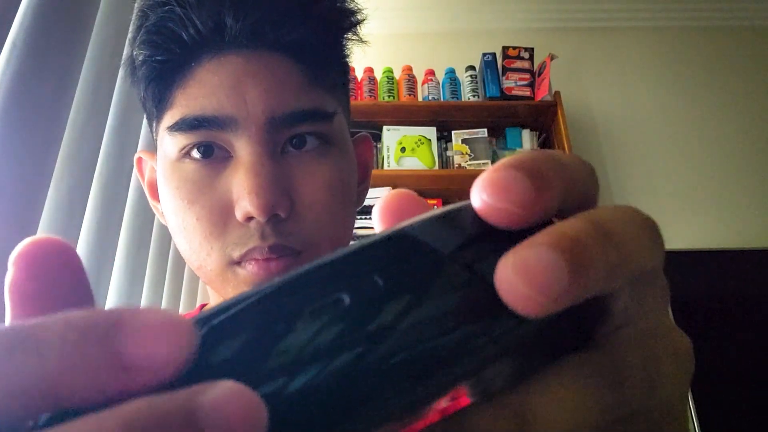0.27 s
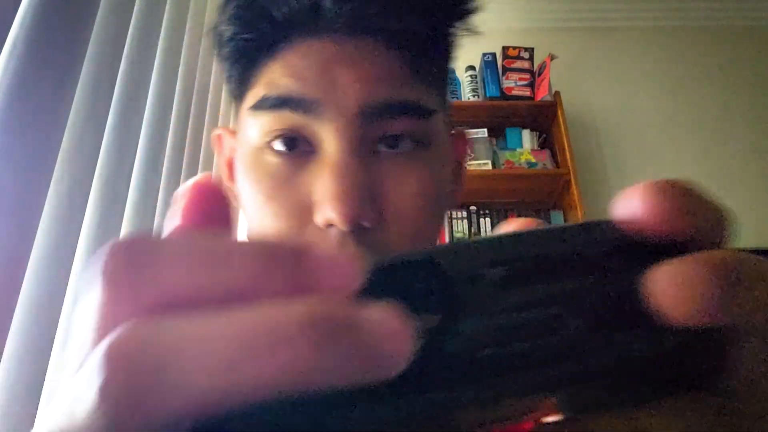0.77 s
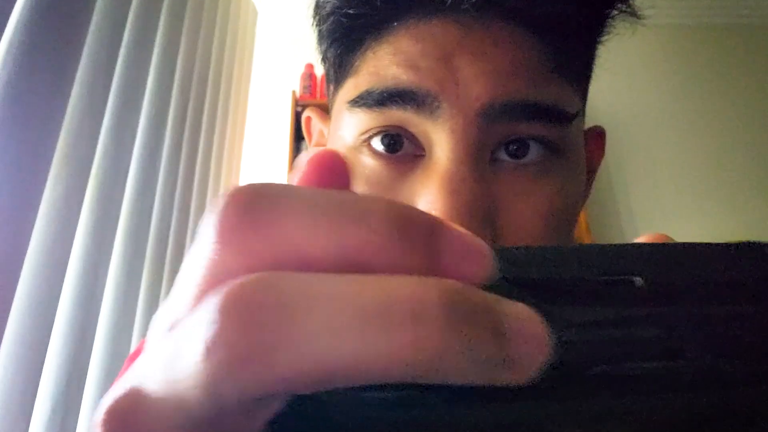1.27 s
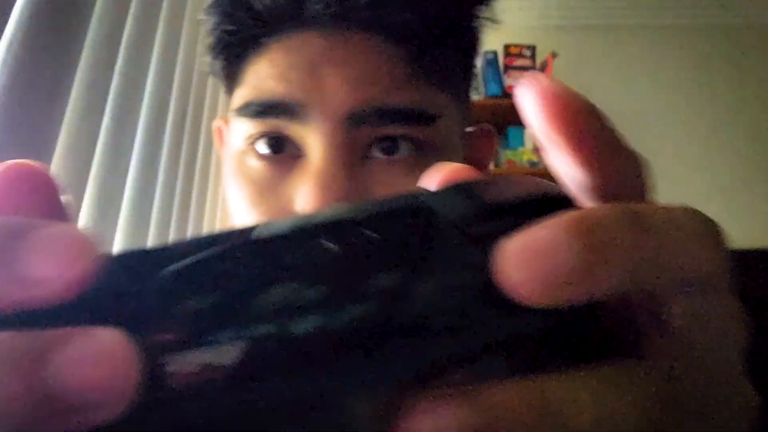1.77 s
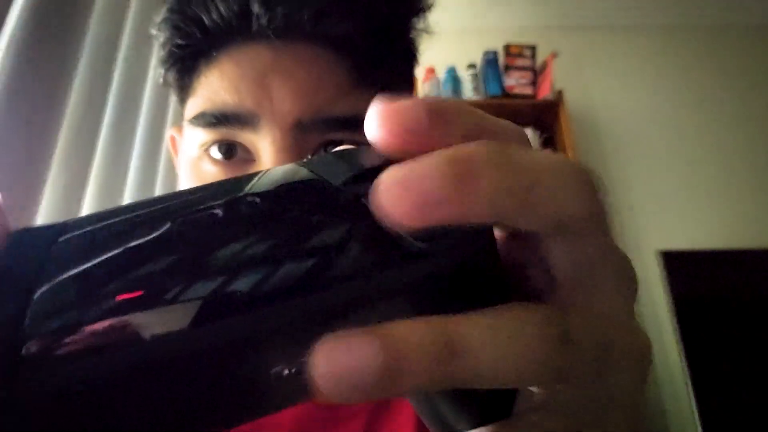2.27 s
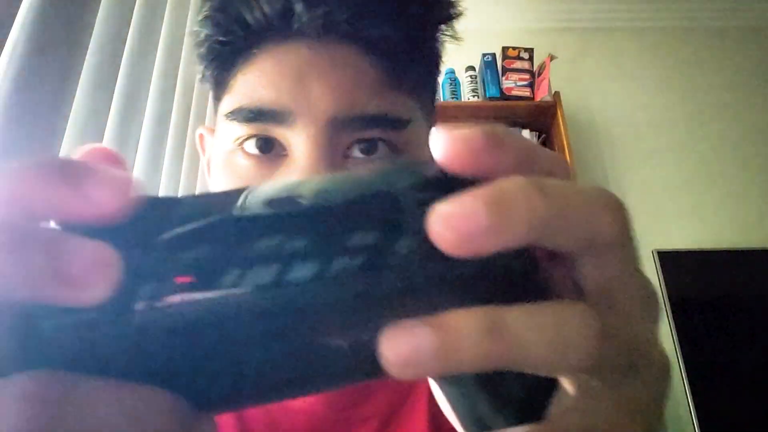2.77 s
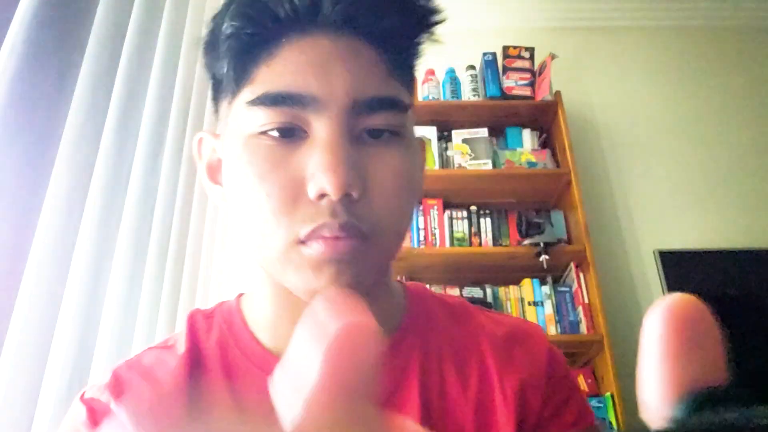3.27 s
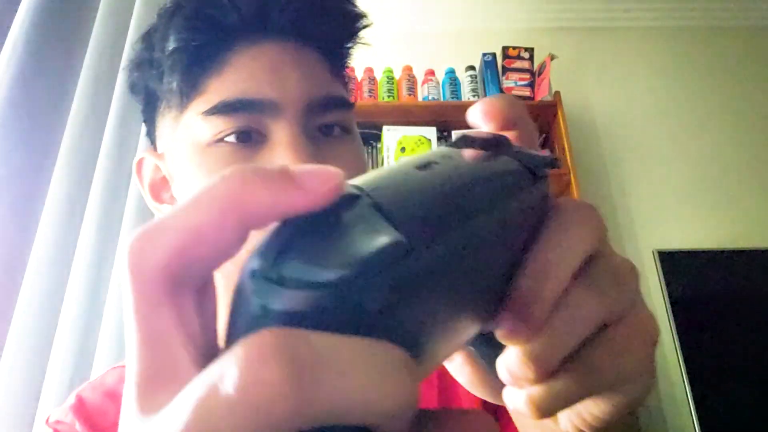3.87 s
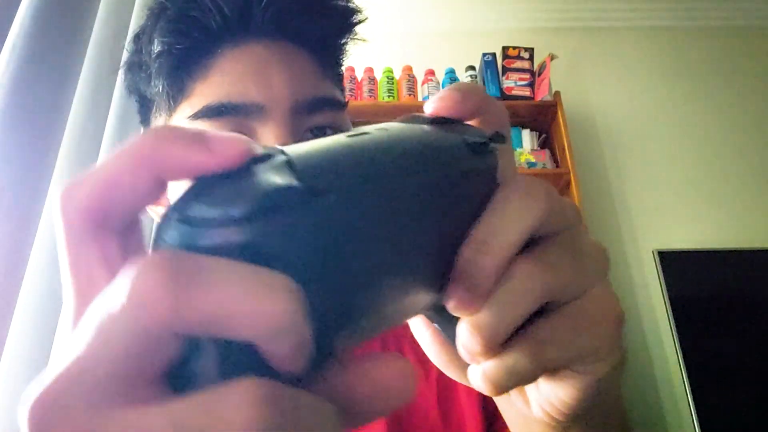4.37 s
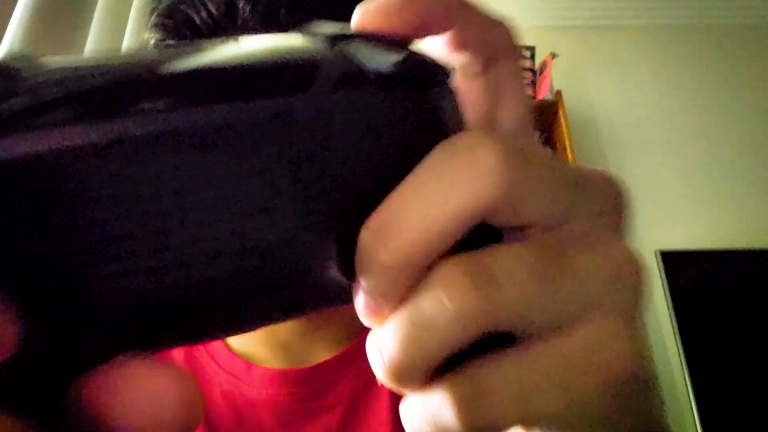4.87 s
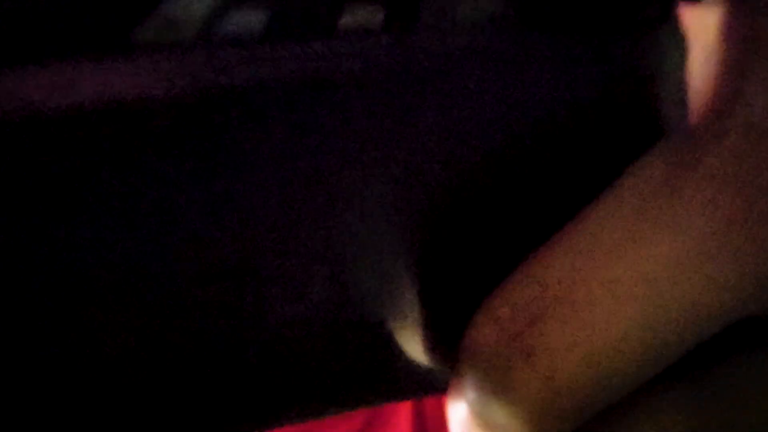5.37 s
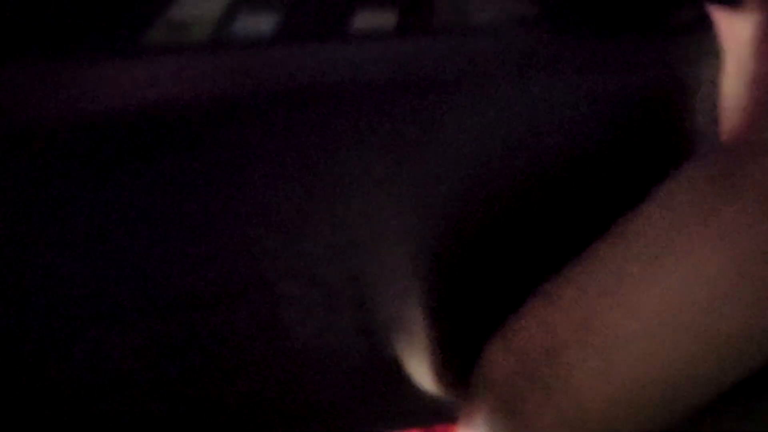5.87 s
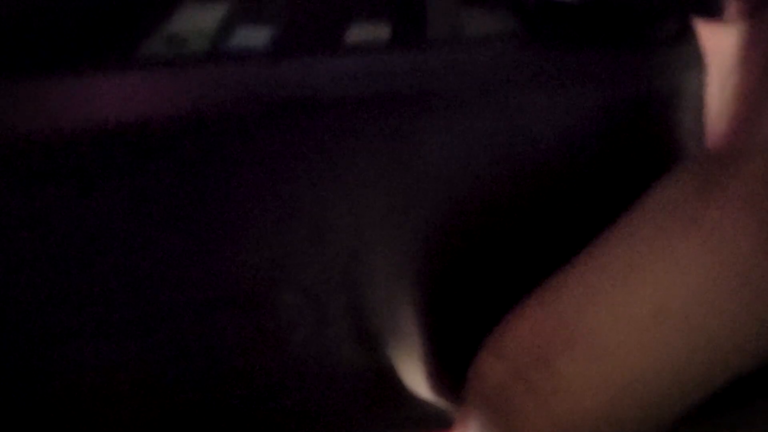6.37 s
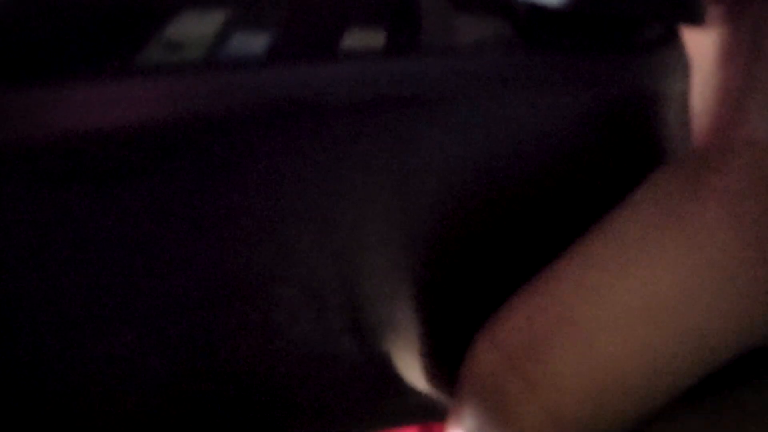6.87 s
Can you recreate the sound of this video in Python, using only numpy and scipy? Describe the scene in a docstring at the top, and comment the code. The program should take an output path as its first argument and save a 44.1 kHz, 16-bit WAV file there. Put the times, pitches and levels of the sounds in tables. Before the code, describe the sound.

Right at the microphone, fingers press buttons, bumpers and triggers of a hollow plastic game controller in quick uneven bursts, each click crisp with a short hollow knock. A few bright trigger snaps stand out, with brief spring buzz and skin rubbing. After five seconds the playing thins to one button softly clicked about five times a second. Small, nearly dry room with faint low rumble.

```python
"""In a small room with a low rumble, fingers work a plastic game controller right at a microphone.
Each press or release of a button, bumper or trigger is a cluster of tiny impacts that rings the hollow shell.
Released trigger springs buzz as decaying bursts of random taps and noise; finger pads thump as damped low sines.
Sliding skin and the kneaded case are noise in swells and spurts; the room answers faintly with a diffuse tail."""
import sys
import numpy as np
from scipy import signal
from scipy.fft import rfft, irfft, next_fast_len
from scipy.io import wavfile
from scipy.ndimage import map_coordinates

SR = 44100
rng = np.random.default_rng(int(sys.argv[2]) if len(sys.argv) > 2 else 0)


def transcribe(u):
    """Save the signal u as a 16-bit wav file named by the first command-line argument.

    u: samples, shape (n,) or (channels, n), limited to [-1, 1]; the rate is SR.
    q: integer samples, one column per channel.
    """
    v = np.clip(np.atleast_2d(u).T, -1, 1)
    q = np.round(v * 32767).astype(np.int16)
    wavfile.write(sys.argv[1], SR, q)


N = 314433

# Buttons pushed firmly to their stop. Each row: time in seconds, relative crack and knock levels in dB.
PRESSES = [(0.0567, -7.5, -18.5), (0.5183, -10, -20), (0.739, -11, -20), (0.9111, -10.5, -21),
           (1.1032, -9, -20), (1.2422, -8, -18.5), (1.4182, -6, -15), (1.5546, -2, -16),
           (1.7933, -18, -29.5), (2.1054, -27, -31), (2.1124, -19.5, -29), (2.3433, -15.5, -25.5),
           (2.5936, -10.5, -19.5), (2.7745, -19, -30), (2.9606, -5, -19), (3.1316, -22, -33.5),
           (3.2241, -15, -23), (3.549, -8, -18), (3.7444, -8.5, -17), (3.9502, -12.5, -21),
           (4.1573, -12, -17), (4.341, -13.5, -22.5), (4.6084, -11.5, -18.5), (4.6264, -19.5, -25.5),
           (4.8055, -7, -18), (4.8255, -15, -21.5), (5.1425, -20, -33), (5.227, -15, -22.5)]
# Buttons coming back up with a hollow tap. Each row: time in seconds, relative crack and knock levels in dB.
RELEASES = [(0.2753, -23.5, -31), (0.5717, -27, -31.5), (1.0792, -19, -27), (1.2624, -19, -28.5),
            (1.4254, -12, -27.5), (1.4714, -25, -32.5), (1.7974, -16, -32), (1.8961, -14.5, -25),
            (2.1829, -10.5, -20.5), (2.6019, -18, -28.5), (2.8156, -19, -26.5), (3.1709, -14.5, -26.5),
            (3.5326, -16, -24), (3.7713, -13, -24.5), (3.9797, -16, -26.5), (4.1633, -9.5, -26),
            (4.363, -15, -26.5), (4.514, -22.5, -35.5)]
# Slower strokes that rub and clack on the case. Each row: time in seconds, relative crack and knock levels in dB.
CLACKS = [(0.0293, -25, -35), (0.4467, -26.5, -31), (0.6302, -25.5, -37), (0.8489, -18, -33),
          (1.0249, -21, -25.5), (1.1967, -23.5, -26.5), (1.9108, -17, -25), (2.0591, -3, -15.5),
          (2.164, -27.5, -26.5), (2.3084, -9, -15), (2.3154, -9.5, -22), (2.7146, -7, -21),
          (2.7358, -16.5, -22.5), (3.303, -18.5, -27.5), (3.8719, -28.5, -27.5), (3.9171, -24.5, -30),
          (4.1025, -26.5, -32), (4.3019, -18, -22.5), (4.7441, -17, -30), (5.1504, -23.5, -25),
          (6.71, -21.5, -22), (6.9088, -21.5, -19.5)]
# Bumpers and triggers snapping back. Each row: time in seconds, relative crack and knock levels in dB.
SNAPS = [(0.9967, -7.5, -31), (1.1648, -23, -38), (1.3468, 2, -24), (1.6701, -20, -43), (1.82, -19.5, -40),
         (3.052, -15, -70), (3.6734, 1.5, -25.5)]
# One button pumped about five times a second.
# Each row: time in seconds, relative level in dB, lead of the finger's landing in seconds.
PUMPS = [(5.031, -16.5, 0.085), (5.238, -17.5, 0.096), (5.414, -20, 0.067), (5.655, -19.5, 0.092),
         (5.846, -19, 0.058), (6.048, -19.5, 0.056), (6.275, -19.5, 0.066), (6.484, -18.5, .074),
         (6.681, -20.5, 0.069), (6.897, -20, 0.079), (7.094, -19.5, 0.068)]
# Resonances of the struck key caps. Each row: frequency in Hz, level in dB re the direct sound, Q.
CLACK_CAP_MODES = [(2230, 4.5, 1.16)]
SNAP_CAP_MODES = [(1890, 11, 9), (2780, 11, 4.2)]
PUMP_CAP_MODES = [(1140, -7.5, 8), (2610, -7.5, 17), (4030, 0, 9.3), (5200, -8, 11)]
LANDING_CAP_MODES = [(2980, -7.5, 2.5)]
# Borders between the knock, clack, snap and tick registers. Each entry: frequency in Hz.
REGISTER_BORDERS_HZ = [1000, 3000, 6500]
# Wall resonances of the shell. Each row: frequency in Hz, level in dB.
SHELL_MODES = [(560, -6.5), (1150, -10.5), (1380, -5), (1950, -31.5), (2750, -29.5), (3950, -5.5),
               (5150, -48), (9250, -2), (12200, -9)]
# Fingertips settling on loose keys. Each row: time in seconds, relative level in dB.
TICKS = [(0.2004, -36.5), (0.3358, -34), (0.8714, -32), (1.746, -30), (1.9644, -30), (2.0325, -24),
         (2.2558, -28), (2.4671, -26.5), (2.5326, -27.5), (2.5687, -23.5), (2.6807, -29), (2.7631, -30),
         (2.8684, -28.5), (2.911, -26), (4.0733, -30), (4.7313, -20)]
# How hard the hands knead the case. Each row: time in seconds, rustle level in dB.
GRIP = [(.4, -60.5), (.9, -56), (2.4, -53), (4.1, -57), (4.65, -53.5), (5.5, -63)]
# Trigger springs left buzzing. Each row: start in seconds, relative level in dB, 60 dB decay time in seconds.
SPRINGS = [(1.352, -34.5, 0.39), (1.554, -29, 0.25), (2.062, -21, 0.075), (2.316, -41, 0.13),
           (3.672, -29, 0.24)]
# Finger pads landing on the case. Each row: time in seconds, relative level in dB.
PADS = [(5.351, -24.5), (5.414, -25), (5.562, -27), (5.657, -28), (5.79, -24), (5.848, -25.5),
        (6.212, -23.5), (6.897, -27)]
# Skin sliding on plastic. Each row: middle in seconds, level in dB, half length in seconds.
SLIDES = [(.92, -58, 0.13), (1.48, -48.5, 0.088), (3.026, -63, 0.027), (3.47, -53.5, 0.33),
          (4.933, -50, 0.071), (5.336, -49.5, 0.064)]
# Noise spectra of sliding skin, rattling case, room air and rumble.
# Each row: frequency in Hz, relative density in dB per Hz.
SKIN_SPECTRUM = [(500, -33), (4300, -10.5), (7500, -16), (12800, -12.5), (16000, -15.5)]
CASE_SPECTRUM = [(300, -21.5), (700, 14), (950, 2.5), (2000, 5.5), (3900, -1.5), (7500, -3.5), (9300, -12),
                 (16000, -13.5)]
AIR_SPECTRUM = [(100, 7.5), (250, -1.5), (450, -7.5), (700, -8.5), (1000, -11), (1800, -24), (4000, -29),
                (7900, -34), (16000, -49)]
RUMBLE_SPECTRUM = [(25, -6), (48, -4), (63, 3.5), (75, -1), (95, -1), (170, -14.5), (400, -48.5)]

LEAD_S = .0041  # a key starts to move this long before its listed time
CAVITY_SPREAD = 0.031  # log-pitch deviation: the hands cover the hollow case differently at each stroke
BAND_LIMIT_HZ = 15600


def amp(db):
    """Decibels to gain."""
    return 10 ** (np.asarray(db) / 20)


def unit(x):
    """Scale to rms 1."""
    return x / np.sqrt(np.mean(x ** 2) + 1e-20)


def along(points, hz):
    """Read (Hz, value) points on a log-frequency axis."""
    point_hz, values = np.transpose(points)
    return np.interp(np.log(hz + 1), np.log(point_hz + 1), values)


def fade(t, t60_s):
    """A decay that loses 60 dB in t60_s."""
    return np.exp(-np.log(1000) * t / t60_s)


def wobble(rate_hz):
    """A smooth random curve through rate_hz knots a second."""
    knots = rng.standard_normal(int(N * rate_hz / SR) + 4)
    return map_coordinates(knots, [np.arange(N) * rate_hz / SR])


def filtered(x, response):
    """Apply a response of frequency in Hz."""
    size = next_fast_len(len(x) + 8192)
    spectrum = rfft(x, size) * response(np.fft.rfftfreq(size, 1 / SR))
    return irfft(spectrum, size)[:len(x)]


def resonance(hz, mode_hz, q):
    """A damped resonator's response, 1 at its peak."""
    return 1 / (1 + 1j * q * (hz / mode_hz - mode_hz / (hz + 1)))


def noise(spectrum):
    """Coloured noise of rms 1."""
    return unit(filtered(rng.standard_normal(N), lambda hz: amp(along(spectrum, hz))))


def add(track, start_s, sound):
    """Mix a sound into the track from start_s."""
    start = int(np.clip(round(start_s * SR), 0, N))
    track[start:start + len(sound)] += sound[:N - start]


def registers(x):
    """Split a sound into knock, clack, snap and tick; the four sum to the original."""
    size = next_fast_len(len(x))
    hz = np.fft.rfftfreq(size, 1 / SR)
    lowpass = 1 / (1 + (hz / np.c_[REGISTER_BORDERS_HZ]) ** 8)
    lows = irfft(rfft(x, size) * lowpass, size)[:, :len(x)]
    return np.diff([0 * x, *lows, x], axis=0)


def playing():
    """Presses are full, releases hollow, slow strokes dull and long, snaps short and bright."""
    presses = keys(PRESSES, cavity_hz=708, contact_s=0.0023, colour_db=[-4, -18, -16, -20])
    releases = keys(RELEASES, cavity_hz=645, contact_s=0.0012, colour_db=[-1.5, -21, -20.5, -16])
    clacks = keys(CLACKS, cavity_hz=666, contact_s=0.0036, colour_db=[-6, -18.5, -24, -20.5])
    snaps = keys(SNAPS, cavity_hz=677, contact_s=0.00073, colour_db=[-5, -31.5, -24.5, -18])
    return presses + releases + cap(clacks, CLACK_CAP_MODES) + cap(snaps, SNAP_CAP_MODES)


def pumping(press_db=[-.5, -8.5, -6, -10], landing_db=[-18, -23, -25, -29]):
    """The finger lands softly on one button, then drives it squarely home; its cap rings alike each time."""
    times_s, level_db, lead_s = np.transpose(PUMPS)
    landings = strokes(times_s - lead_s, np.c_[level_db] + landing_db, cavity_hz=720, contact_s=0.0048)
    presses = strokes(times_s, np.c_[level_db] + press_db, cavity_hz=720, contact_s=.0012, strike_db=20.5)
    return cap(landings, LANDING_CAP_MODES) + cap(presses, PUMP_CAP_MODES)


def keys(rows, cavity_hz, contact_s, colour_db):
    """Strokes of one kind share mean pitch, contact time and colour; crack drives the three upper registers."""
    times_s, crack_db, knock_db = np.transpose(rows)
    levels_db = np.c_[knock_db, crack_db, crack_db, crack_db] + colour_db
    return strokes(times_s, levels_db, cavity_hz, contact_s)


def strokes(times_s, levels_db, cavity_hz, contact_s, strike_db=18):
    """One click at each time, with its row of knock, clack, snap and tick levels."""
    track = np.zeros(N)
    for s, row_db in zip(times_s, levels_db):
        stroke_hz = cavity_hz * np.exp(CAVITY_SPREAD * rng.standard_normal())
        add(track, s - LEAD_S, click(stroke_hz, contact_s, row_db, strike_db))
    return track


def click(cavity_hz, contact_s, levels_db, strike_db, low_cut_hz=340):
    """Contact force rings the shell; where the key sits on the case sets the strength of each register."""
    t = np.arange(SR // 20) / SR
    sound = signal.fftconvolve(contact(t, contact_s), shell(t, cavity_hz, strike_db))[:len(t)]
    low_cut = signal.butter(2, low_cut_hz, "high", fs=SR, output="sos")
    parts = registers(signal.sosfilt(low_cut, sound))
    # equal energy per register: that of rms 1 over 5 ms
    parts = parts / np.sqrt(np.sum(parts ** 2, axis=1, keepdims=True) / (SR * .005))
    return amp(levels_db) @ parts


def contact(t, contact_s, rub_db=-28, chatter_db=-8, bounces=3):
    """Force of one press: the key rubs in its guide, hits its stop, then chatters."""
    stop = SR // 200  # 5 ms into the buffer
    since_s = t - t[stop]
    rub_shape = np.exp(-np.maximum(since_s, -2 * since_s) / contact_s)
    force = amp(rub_db) * rng.standard_normal(len(t)) * rub_shape
    bounce_s = contact_s * (np.arange(bounces) + rng.uniform(0, 1, bounces)) / bounces
    np.add.at(force, stop + (bounce_s * SR).astype(int), amp(chatter_db) * rng.standard_normal(bounces))
    # a slow press is mostly rub and chatter, a quick one lands at once
    force *= contact_s / 0.0039
    force[stop] += 1
    return force


def shell(t, cavity_hz, strike_db, cavity_db=-6, cavity_t60_s=0.023, crack_t60_s=0.034, damping=0.46):
    """The case's answer to a blow: a tock of the air inside, a clean strike and a dense crack of the walls."""
    tock = amp(cavity_db) * np.cos(2 * np.pi * cavity_hz * t) * fade(t, cavity_t60_s)
    # plastic damps each higher register sooner
    crack = np.zeros(len(t))
    for k, part in enumerate(registers(rng.standard_normal(len(t)))):
        crack += part * fade(t, crack_t60_s / (1 + damping * k))
    strike = fade(t, .0003)
    strike = amp(strike_db) * strike / strike.sum()
    return bending(tock + walls(crack + strike))


def walls(x, q=12, direct_db=-5):
    """Sound leaves the case directly and through the broad resonances of its plastic walls."""
    def response(hz):
        return amp(direct_db) + sum(amp(db) * resonance(hz, mode_hz, q) for mode_hz, db in SHELL_MODES)
    return filtered(x, response)


def bending(x, delay_at_1khz_s=.0013):
    """Bending waves run faster as pitch rises, so a click's treble arrives ahead of its knock."""
    return filtered(x, lambda hz: np.exp(-4j * np.pi * delay_at_1khz_s * np.sqrt(1000 * hz)))


def cap(x, modes):
    """The struck key cap adds resonances of its own, the same at every stroke."""
    for mode_hz, db, q in modes:
        x = filtered(x, lambda hz: 1 + amp(db) * resonance(hz, mode_hz, q))
    return x


def loose_keys(level_db=-34, spread_db=2, colour_db=[-14, -17, -19, -23], count=36):
    """Keys have play: a few clear ticks, and fainter ones most often while the hands knead the case."""
    grid_s = np.arange(0, N, 100) / SR
    effort = np.cumsum(amp(np.interp(grid_s, *np.transpose(GRIP))) ** 2)
    # even steps of accumulated effort, jittered
    shares = (np.arange(count) + rng.random(count)) / count
    faint_s = np.interp(shares, effort / effort[-1], grid_s)
    faint_db = level_db + spread_db * rng.standard_normal(count)
    times_s, tick_db = np.r_[TICKS, np.c_[faint_s, faint_db]].T
    return strokes(times_s, np.c_[tick_db] + colour_db, cavity_hz=713, contact_s=0.0042)


def springs(bounces_per_s=350, buzz_db=-1):
    """A released trigger's spring buzzes and bounces against the shell as it dies away."""
    t = np.arange(SR // 2) / SR
    swing = np.zeros(N)
    for s, db, t60_s in SPRINGS:
        add(swing, s, amp(db) * fade(t, t60_s))
    taps = rng.standard_normal(N) * (rng.random(N) < bounces_per_s / SR)
    rattle = filtered(walls(taps), lambda hz: amp(along(CASE_SPECTRUM, hz)))
    return swing * unit(unit(rattle) + amp(buzz_db) * noise(CASE_SPECTRUM))


def pads(push_hz=95, t60_s=0.046, level_db=4):
    """A soft finger pad gives the whole case one low push."""
    t = np.arange(SR // 10) / SR
    track = np.zeros(N)
    for s, db in PADS:
        add(track, s, amp(db + level_db) * np.sin(2 * np.pi * push_hz * t) * fade(t, t60_s))
    return track


def skin(grain_db=2, creak_db=4, rest_db=-61):
    """Hands shift their grip: sliding skin hisses in swells, the kneaded case rustles in small spurts."""
    t = np.arange(N) / SR
    slide_power = amp(rest_db) ** 2
    for middle_s, db, half_s in SLIDES:
        slide_power = slide_power + amp(db) ** 2 * np.exp(-((t - middle_s) / half_s) ** 2)
    hiss = np.sqrt(slide_power) * unit(noise(SKIN_SPECTRUM) * amp(grain_db * wobble(220)))
    kneading = amp(np.interp(t, *np.transpose(GRIP)))
    rustle = kneading * unit(noise(CASE_SPECTRUM) * amp(creak_db * wobble(110)))
    return hiss + rustle


def room(x, t60_s=0.24, build_up_s=0.003):
    """The room stores the energy of each register and gives it back as a diffuse tail."""
    t = np.arange(SR // 2) / SR
    store = (fade(t, t60_s) * (1 - np.exp(-t / build_up_s))) ** 2
    energies = signal.fftconvolve(registers(x) ** 2, store[None] / store.sum(), axes=1)[:, :N]
    fields = registers(walls(noise(CASE_SPECTRUM)))
    return sum(np.sqrt(np.abs(energy)) * unit(field) for energy, field in zip(energies, fields))


def background(air_db=-51, rumble_db=-42):
    """Steady room air and low rumble, each a coloured noise."""
    return amp(air_db) * noise(AIR_SPECTRUM) + amp(rumble_db) * noise(RUMBLE_SPECTRUM)


def scene(room_db=-18):
    """The controller close by, over the room's tail, air and rumble."""
    close = playing() + pumping() + loose_keys() + springs()
    mix = close + amp(room_db) * room(close) + pads() + skin() + background()
    return mix[None]


def record(dry, low_cut_hz=42, ceiling=.9):
    """The microphone sheds deep bass; the recorder rounds tall peaks and cuts steeply at its band limit."""
    low_cut = signal.butter(4, low_cut_hz, "high", fs=SR, output="sos")
    heard = signal.sosfilt(low_cut, dry)
    heard = heard / (1 + np.abs(heard / ceiling) ** 8) ** (1 / 8)
    return np.array([filtered(x, lambda hz: 1 / np.sqrt(1 + (hz / BAND_LIMIT_HZ) ** 200)) for x in heard])


dry = scene()
out = record(dry)
transcribe(out)
```